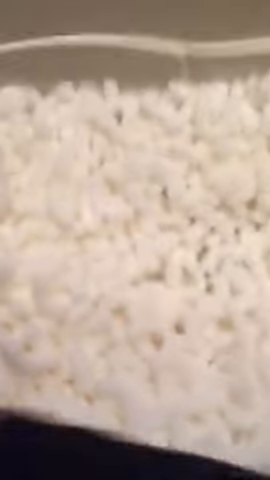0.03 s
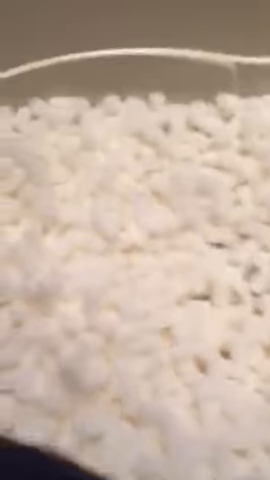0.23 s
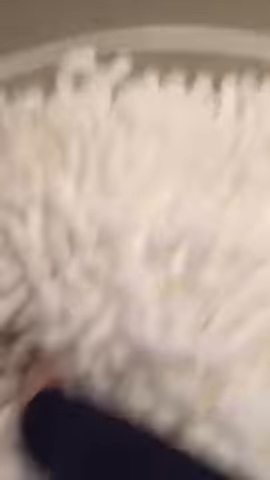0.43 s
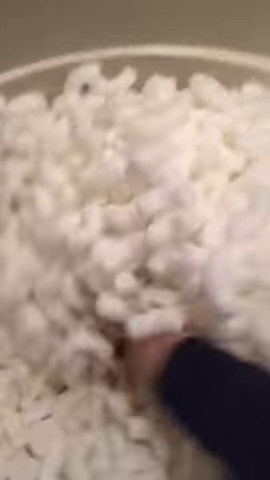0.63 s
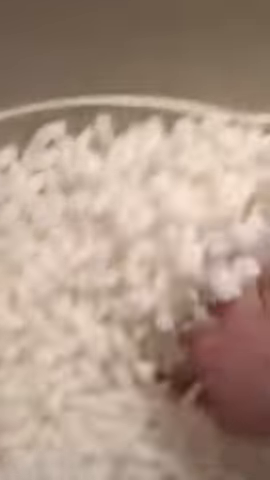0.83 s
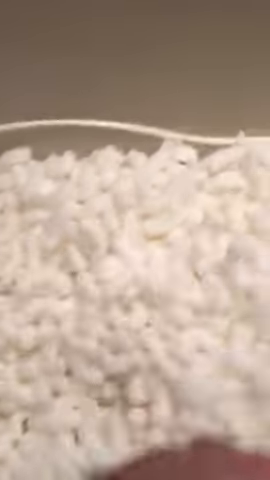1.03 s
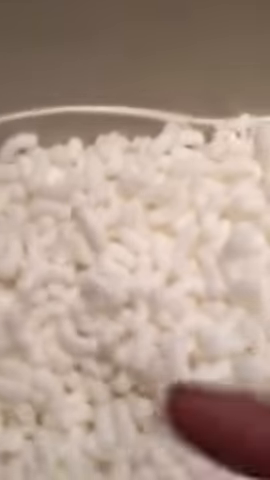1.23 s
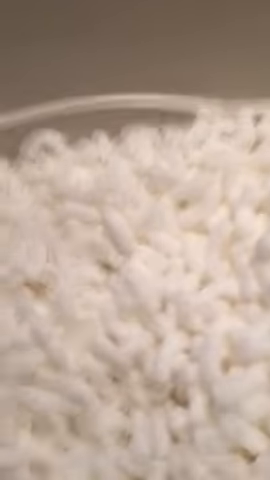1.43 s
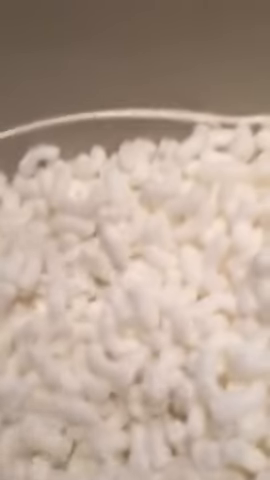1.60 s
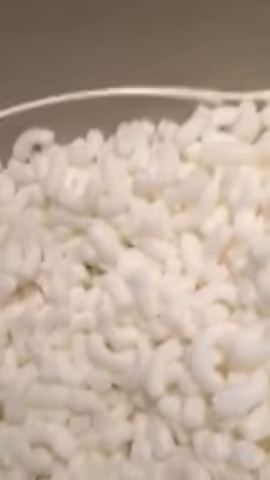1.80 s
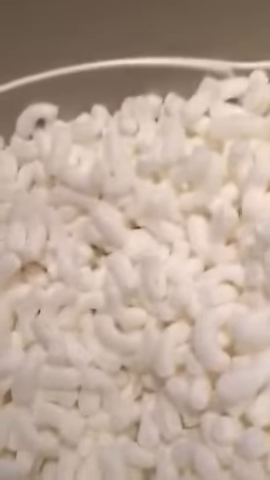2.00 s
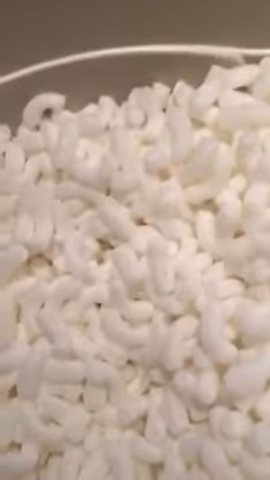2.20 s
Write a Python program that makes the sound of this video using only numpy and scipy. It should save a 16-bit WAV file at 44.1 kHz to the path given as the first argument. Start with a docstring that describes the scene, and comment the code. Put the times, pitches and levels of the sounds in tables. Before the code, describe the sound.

Foam packing peanuts rustle and hiss as a hand scoops through them in a tub.

```python
"""A faint brushing, then a sudden rustle: a hand plunges into a plastic tub of foam packing peanuts,
scoops through them and lets them settle. Countless tiny slips between the pieces make a dense hiss;
the light pieces bump and patter underneath. A few snap or knock close by, and the heap slumps
against the tub with soft thuds. Small quiet room, mono."""
import sys
import numpy as np
from scipy import signal
from scipy.fft import rfft, irfft
from scipy.io import wavfile

SR = 44100
rng = np.random.default_rng(int(sys.argv[2]) if len(sys.argv) > 2 else 0)


def int16_out(signal):
    """Quantize to a 16-bit WAV file."""
    q = np.round(np.clip(np.atleast_2d(signal).T, -1, 1) * 32767)
    wavfile.write(sys.argv[1], SR, q.astype(np.int16))


N = 103635
TIME = np.arange(N) / SR
SLIPS_PER_S, BUMPS_PER_S, TUMBLES_PER_S = 14000, 1100, 500


def amp(db):
    """Decibels to gain."""
    return 10 ** (np.asarray(db) / 20)


def unit(x):
    """Scales to rms 1."""
    return x / np.sqrt(np.mean(x ** 2) + 1e-20)


def curve(rows, column=1):
    """One column of an automation table at every sample."""
    rows = np.array(rows)
    return np.interp(TIME, rows[:, 0], rows[:, column])


def add(mix, start_s, sound):
    """Mixes a sound in at its start time."""
    part = mix[max(round(start_s * SR), 0):][:len(sound)]
    part += sound[:len(part)]


def decay(t, t60):
    """An exponential tail, 60 dB down at t60."""
    return np.exp(-np.log(1000) * t / t60)


def ring(t, hz, t60, rise_s):
    """One damped mode with a softened attack."""
    return np.sin(2 * np.pi * hz * t) * decay(t, t60) * (1 - np.exp(-t / rise_s))


def colour(x, eq, size=4096):
    """Gives every click in x a causal ring shaped like the EQ curve; rms 1."""
    hz, db = np.transpose(eq)
    bin_hz = abs(np.fft.fftfreq(size, 1 / SR)) + 1
    log_gain = np.log(amp(np.interp(np.log(bin_hz), np.log(hz), db)))
    impulse = np.fft.ifft(np.exp(np.conj(signal.hilbert(log_gain)))).real  # minimum phase
    return unit(signal.fftconvolve(x, impulse[:size // 2])[:N])


def contacts(per_s, spread_db=2.5, largest=1.91):
    """Random clicks of either sign: many small, a few large."""
    hits = rng.random(N) < per_s / SR
    size = np.minimum(rng.exponential(1, N), largest)
    return hits * rng.choice([-1., 1.], N) * amp(spread_db * size)


def flutter(rate_hz):
    """A random wobble up to about this rate; rms 1."""
    hz = np.fft.rfftfreq(N, 1 / SR)
    spectrum = rfft(rng.standard_normal(N)) * hz / (hz + 10) / (1 + (hz / rate_hz) ** 2)
    return unit(irfft(spectrum, N))


# EQ of the room tone: f/Hz, relative level/dB
ROOM_EQ = [(20, -40), (50, -6), (100, 1.5), (160, -6), (300, -10), (500, -16), (1000, -18), (4000, -28),
           (15000, -30.5)]
def room_tone(level_db=-66.5):
    """A quiet bed of noise with a low hum to it."""
    return amp(level_db) * colour(rng.standard_normal(N), ROOM_EQ)


def echoes(x, t60=0.07):
    """Short scattered reflections from the tub and the walls."""
    t = np.arange(SR // 4) / SR
    taps = rng.standard_normal(len(t)) * (rng.random(len(t)) < 1 / 20) * decay(t, t60)
    return signal.fftconvolve(x, taps / np.linalg.norm(taps))[:N]


# fader ride of the light brush before the plunge: t/s, level/dB
BRUSH_RIDE = [(0, -73), (.04, -64.5), (.07, -68), (.1, -77.5), (.16, -81), (.205, -79), (.23, -65.5)]
def brush(patter_db=-4):
    """A faint rustle of slips and bumps as the arm comes over the heap."""
    slips = colour(contacts(SLIPS_PER_S), PRESSED_EQ)
    bumps = colour(contacts(BUMPS_PER_S), PATTER_EQ)
    return (slips + amp(patter_db) * bumps) * amp(curve(BRUSH_RIDE))


# cues for the slumping heap: t/s, level/dB, f/Hz, ring t60/s
THUD_CUES = [(0.28, -30, 227, 0.087), (0.325, -25.5, 190, 0.084), (0.736, -27, 105, 0.081),
             (1.545, -23.5, 223, 0.0266), (1.550, -35.5, 62, 0.082)]
def thuds():
    """The heap slumps against the tub, each time sounding one low, damped mode."""
    out, t = np.zeros(N), np.arange(SR // 5) / SR
    for start_s, level_db, hz, t60 in THUD_CUES:
        add(out, start_s, amp(level_db) * ring(t, hz, t60, rise_s=0.0017))
    return out


# cues for close snaps and knocks: t/s, level/dB, f/Hz, ring t60/s, crack against ring/dB
SNAP_CUES = [(0.1224, -49.5, 1650, 0.0072, -4.5), (0.1205, -67, 3870, 0.0056, -12),
             (.2348, -44, 6800, .005, -4), (.2455, -31.5, 2200, 0.012, -18),
             (.2885, -21.5, 690, 0.015, -26), (0.3919, -15, 2820, 0.0054, -13),
             (0.4902, -20, 3560, 0.0061, -14), (.5345, -30, 580, 0.0065, -13),
             (0.8226, -21, 315, 0.0079, -17), (.8835, -35.5, 1010, 0.014, 2),
             (1.003, -32.5, 1690, .005, -5), (1.0545, -22, 1380, 0.0089, -15),
             (1.0555, -29.5, 2280, 0.0069, -10.5), (1.149, -35, 300, 0.015, -16),
             (1.445, -32.5, 434, 0.027, -8), (1.4932, -34.5, 900, 0.0059, -1.5),
             (1.496, -36, 5530, 0.0076, -16), (1.541, -33.5, 905, 0.011, -5),
             (1.694, -43, 1520, 0.0056, -4), (1.6942, -28, 665, 0.018, -20), (1.809, -38, 560, .035, -27),
             (1.862, -40.5, 670, 0.021, -16), (1.952, -41.5, 635, 0.039, -22),
             (2.077, -42.5, 546, 0.033, -12), (2.158, -36.5, 474, .025, -10)]
def snaps(overtone_ratio=1.66, overtone_db=-8.5, crack_width=1.56):
    """Single pieces spring free: a short crack around the pitch and a brief ring of the body."""
    out, t = np.zeros(N), np.arange(SR // 10) / SR
    for start_s, level_db, hz, t60, crack_db in SNAP_CUES:
        rise_s = 0.17 / hz  # big, low pieces start softly
        overtone = amp(overtone_db) * ring(t, hz * overtone_ratio, t60 / 2, rise_s)
        body = ring(t, hz, t60, rise_s) + overtone
        band = signal.butter(1, [hz / crack_width, hz * crack_width], "bandpass", fs=SR)
        noise = unit(signal.lfilter(*band, rng.standard_normal(len(t))))
        crack = noise * decay(t, t60=0.018) * (1 - np.exp(-t / rise_s))
        add(out, start_s, amp(level_db) * (body + amp(crack_db) * crack))
    return out


# how hard the heap is churned: t/s, patter level/dB, tumble level before shoves/dB
CHURN_RIDE = [(.235, -42, -45.5), (.28, -41.5, -40), (.45, -37.5, -38), (.6, -41, -42.5), (.9, -43, -43),
              (1.02, -46.5, -46.5), (1.11, -51, -49), (1.15, -45, -44.5), (1.27, -61.5, -58.5),
              (1.33, -49, -45.5), (1.48, -53.5, -53), (1.55, -47, -48), (1.6, -53, -51), (1.78, -56.5, -57),
              (1.81, -63, -49.5), (1.87, -57, -51), (1.92, -59.5, -61.5), (1.98, -57, -51.5),
              (2.16, -54.5, -51.5), (2.35, -58.5, -56)]
# shoves of the hand that swell the tumble: t/s, length/s, boost/dB
SHOVE_CUES = [(0.32, 0.1, 1.5), (.5, 0.045, 6.5), (.71, .06, 7), (0.804, 0.03, 5.5), (0.945, 0.046, 5),
              (1.15, 0.046, 6), (1.2, 0.079, 9), (1.345, 0.068, 2.5), (2.235, 0.046, 6)]
# EQs of the soft midrange collisions and the bassy tumble: f/Hz, relative level/dB
PATTER_EQ = [(30, -37), (100, -23), (250, -2), (400, -0.5), (620, 2), (780, -3), (950, -0.5), (1300, -5),
             (1800, -13), (3000, -23), (8000, -45)]
TUMBLE_EQ = [(20, -59), (35, -20), (55, -11), (80, -6.5), (110, -0.5), (150, 1.5), (195, -2.5), (245, -4),
             (345, -4), (430, -15.5), (900, -36.5), (3000, -71)]
def churn():
    """Pieces bump each other, and the heap tumbles dully in the tub, swelling with each shove."""
    shove_db = sum(boost_db * np.sin(np.pi * np.clip((TIME - start_s) / length_s, 0, 1))
                   for start_s, length_s, boost_db in SHOVE_CUES)
    patter = colour(contacts(BUMPS_PER_S), PATTER_EQ)
    tumble = colour(contacts(TUMBLES_PER_S, spread_db=3), TUMBLE_EQ)
    return patter * amp(curve(CHURN_RIDE)) + tumble * amp(curve(CHURN_RIDE, column=2) + shove_db)


# how hard the pieces slide over each other: t/s, level/dB
SLIDE_RIDE = [(.235, -46.5), (.28, -34), (.32, -34.5), (.37, -35.5), (.5, -36.5), (.58, -39.5), (.9, -42.5),
              (1.1, -47), (1.28, -54.5), (1.31, -48), (1.34, -48.5), (1.39, -54.5), (1.47, -55),
              (1.55, -51), (1.7, -47), (1.82, -52), (1.92, -55.5), (1.98, -56), (2.02, -53.5), (2.16, -49),
              (2.19, -54), (2.24, -47), (2.29, -51.5), (2.35, -49.5)]
# fader ride of the top-end fizz: t/s, level before trim/dB
FIZZ_RIDE = [(0.24, -51.5), (0.27, -47.5), (0.61, -50.5), (0.94, -49.5), (0.96, -51.5), (1.52, -65.5),
             (1.7, -58), (1.97, -68), (2.17, -60), (2.2, -65), (2.23, -59.5), (2.35, -61)]
# EQs of pressed slips, loose slips and the finest fizz: f/Hz, relative level/dB
PRESSED_EQ = [(500, -15.5), (1500, -5), (2000, -3), (2500, -1), (3300, -1), (4300, 0.5), (4900, -5.5),
              (6500, -5), (9400, -11.5), (10400, -16), (15500, -37)]
LOOSE_EQ = [(500, -14.5), (1500, -8), (2400, -10.5), (3300, -.5), (4400, -4), (4950, -6.5), (6500, -6.5),
            (9400, -11.5), (10400, -17), (15500, -33)]
FIZZ_EQ = [(3000, -34), (6000, -7), (7200, -7), (9500, -2.5), (10400, -8), (11500, -4), (13000, -7),
           (15000, -9), (15500, -14)]
def hiss(fizz_trim_db=2.5, flutter_db=0.74):
    """Foam slips on foam in tiny jerks, fuller when pressed than when loose, with a fine fizz on top."""
    level_db = curve(SLIDE_RIDE)
    pressure = (level_db - level_db.min()) / np.ptp(level_db)
    slips = contacts(SLIPS_PER_S)
    body = pressure * colour(slips, PRESSED_EQ) + (1 - pressure) * colour(slips, LOOSE_EQ)
    fizz = colour(contacts(SLIPS_PER_S), FIZZ_EQ) * amp(curve(FIZZ_RIDE) + fizz_trim_db)
    return (body * amp(level_db) + fizz) * amp(flutter_db * flutter(rate_hz=95))


def scene(plunge_s=0.2335, crossfade_s=0.0053, echo_db=-9.5):
    """The brush gives way to the full rustle as the hand goes in; snaps and thuds echo briefly."""
    plunged = np.clip((TIME - plunge_s) / crossfade_s, 0, 1)
    rustle = plunged * (hiss() + churn()) + (1 - plunged) * brush()
    knocks = snaps() + thuds()
    mono = rustle + knocks + amp(echo_db) * echoes(knocks) + room_tone()
    return np.array([mono, mono])


def record(dry, low_cut_hz=42, high_cut_hz=15500):
    """A low cut clears the rumble and a steep high cut takes off the very top."""
    thinned = signal.lfilter(*signal.butter(3, low_cut_hz, "highpass", fs=SR), dry)
    lowpass = signal.firwin(511, high_cut_hz, window=("kaiser", 9), fs=SR)
    return signal.oaconvolve(thinned, lowpass[None], "same", axes=1)


dry = scene()
out = record(dry)
int16_out(out)
```